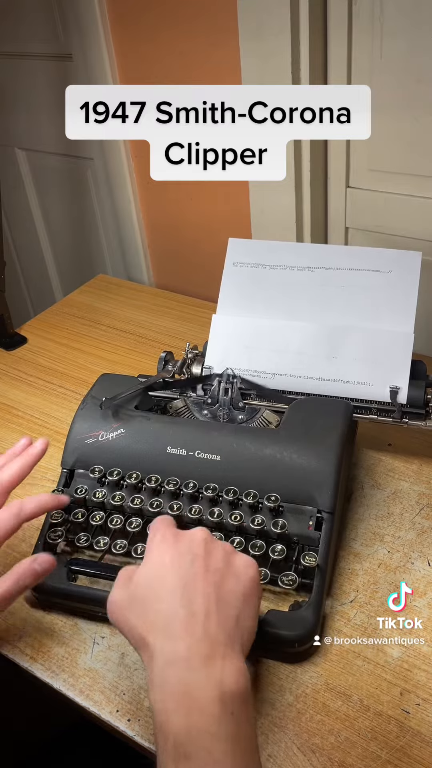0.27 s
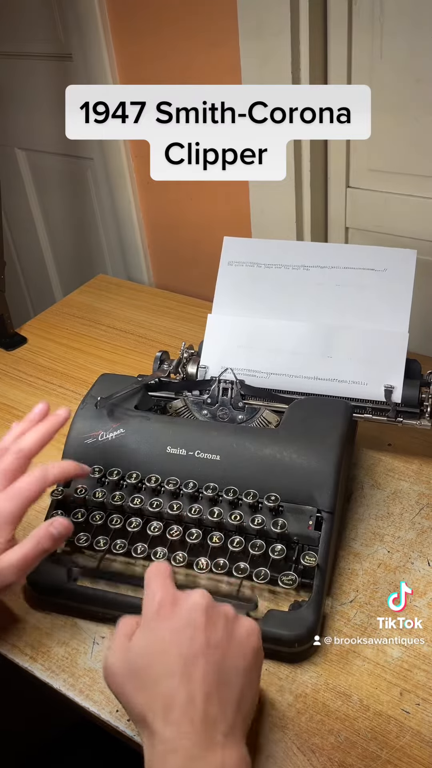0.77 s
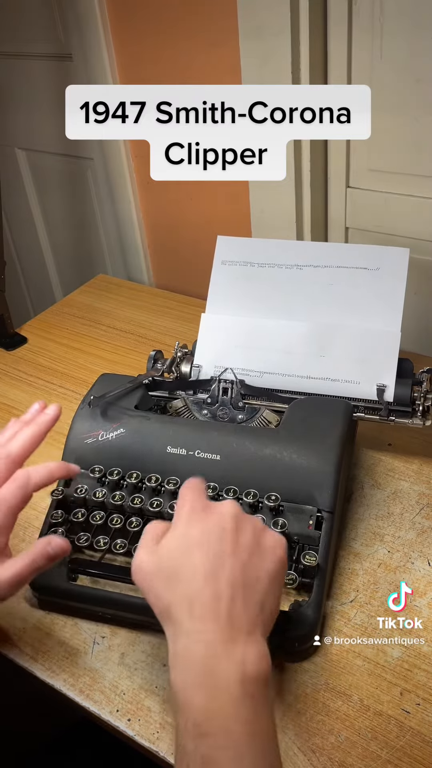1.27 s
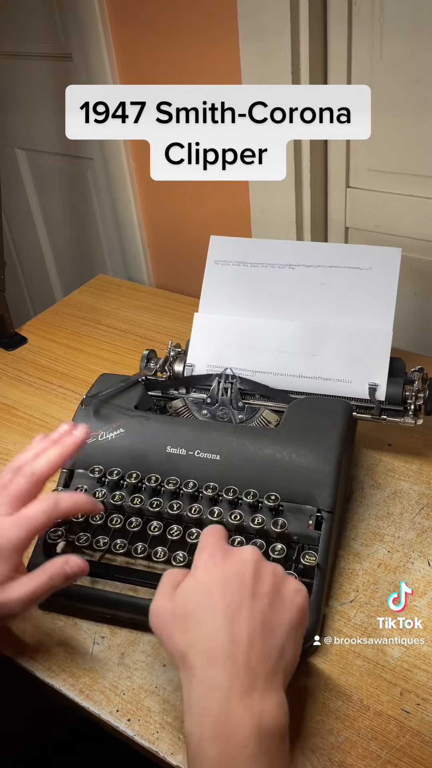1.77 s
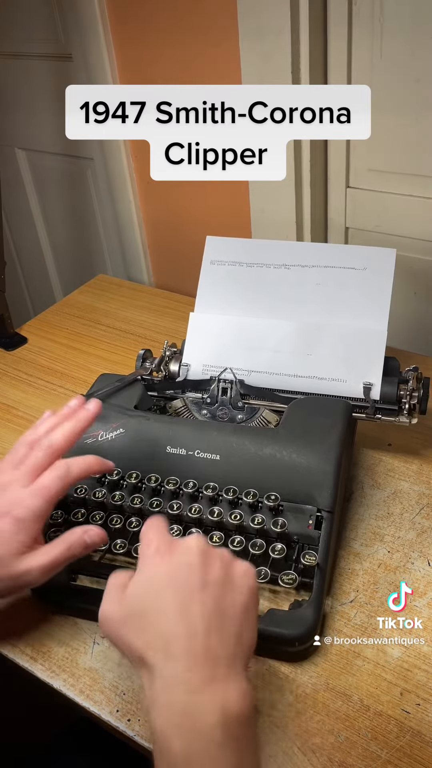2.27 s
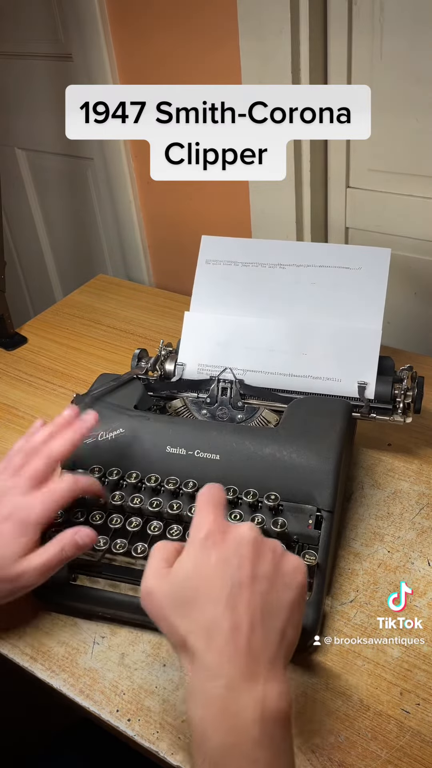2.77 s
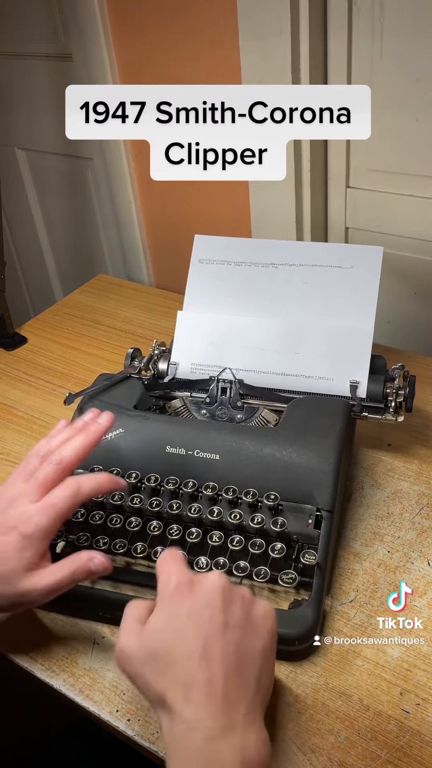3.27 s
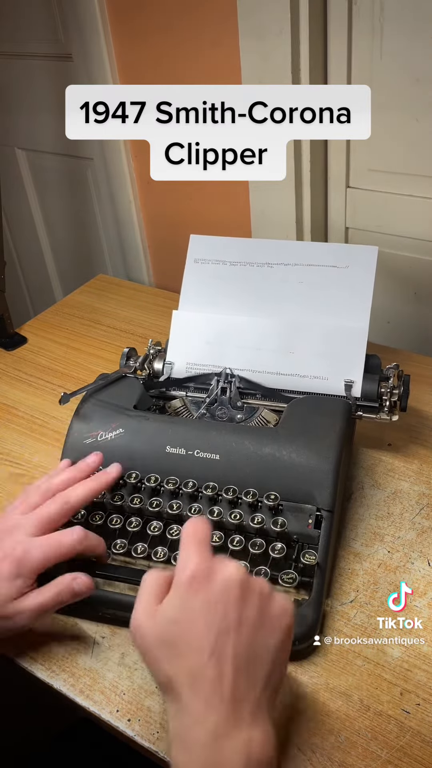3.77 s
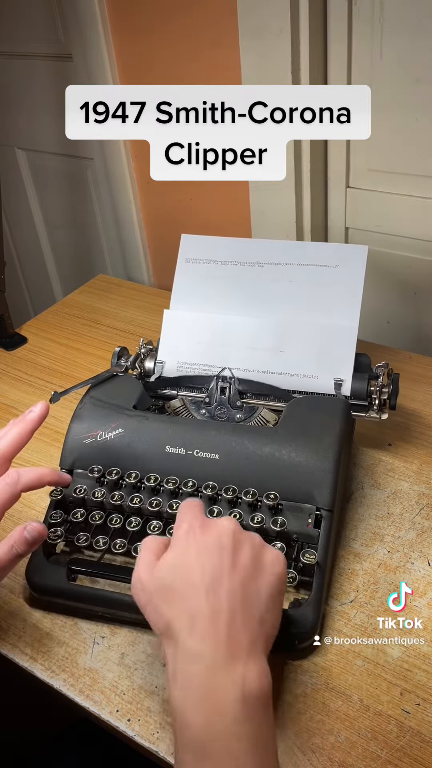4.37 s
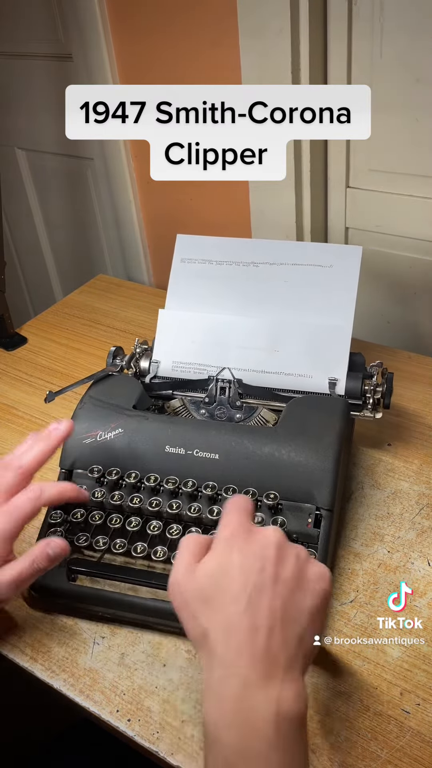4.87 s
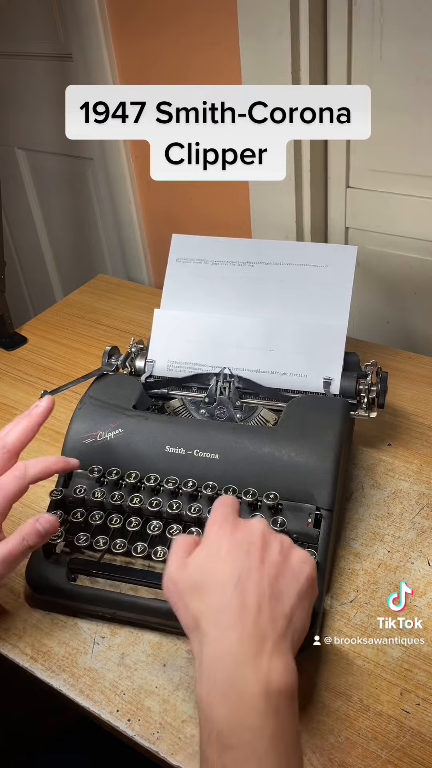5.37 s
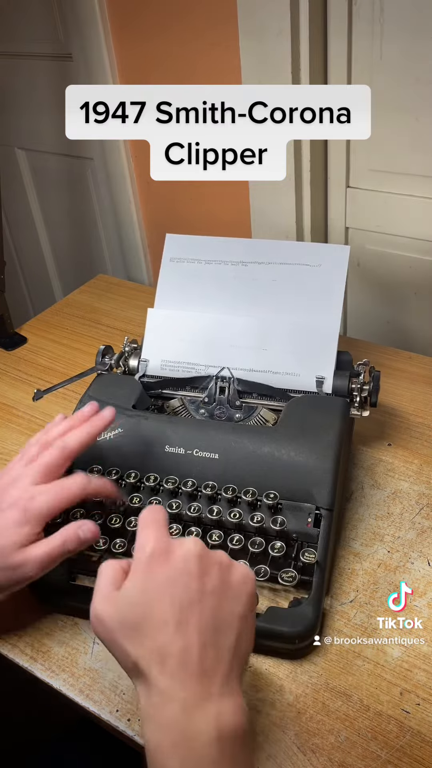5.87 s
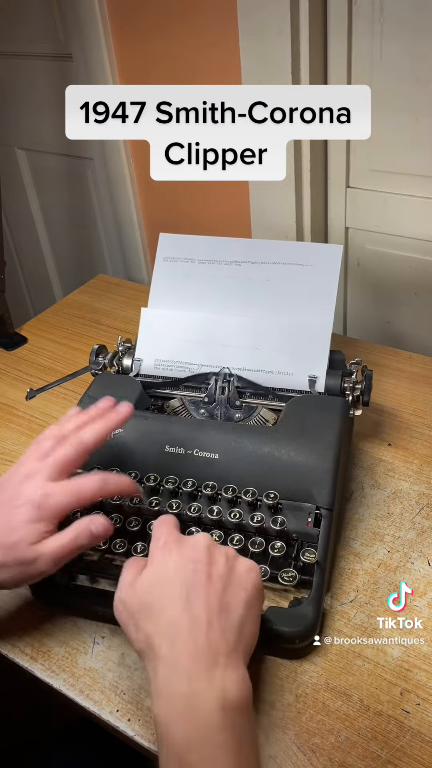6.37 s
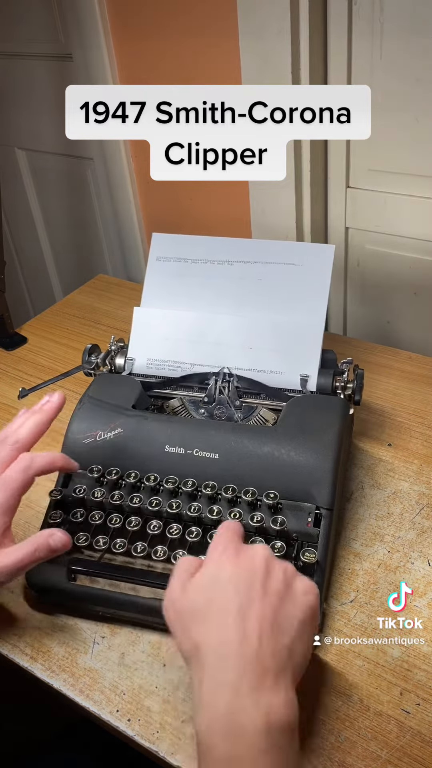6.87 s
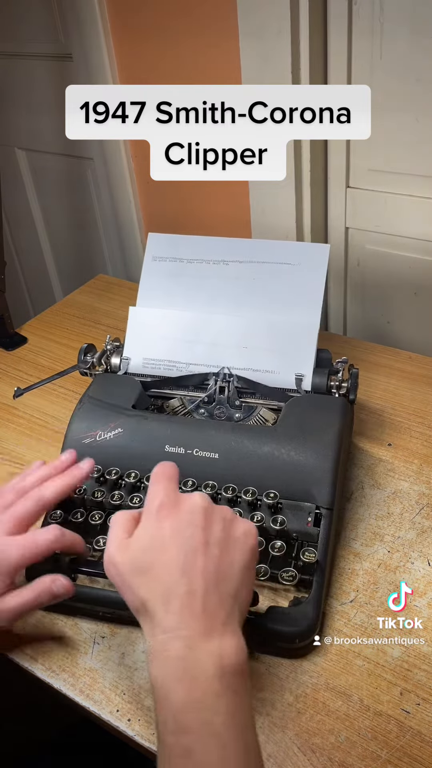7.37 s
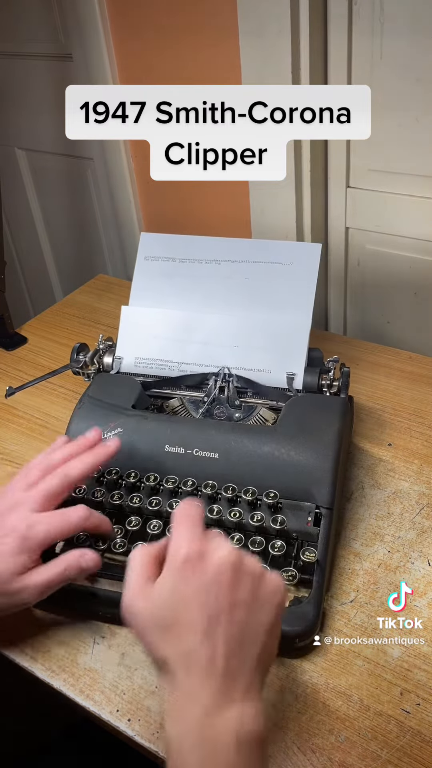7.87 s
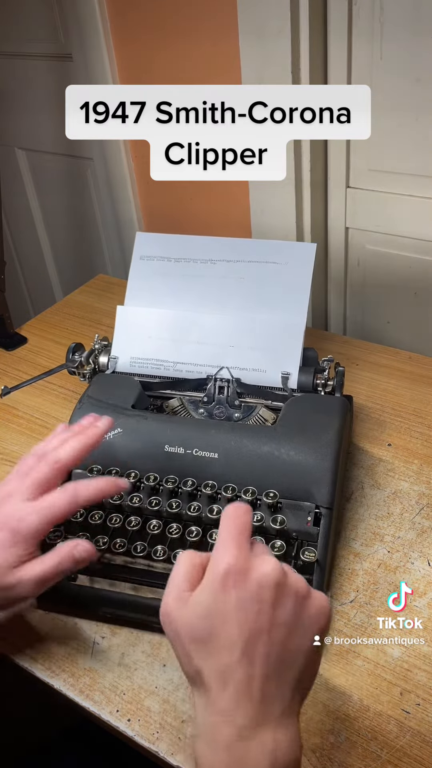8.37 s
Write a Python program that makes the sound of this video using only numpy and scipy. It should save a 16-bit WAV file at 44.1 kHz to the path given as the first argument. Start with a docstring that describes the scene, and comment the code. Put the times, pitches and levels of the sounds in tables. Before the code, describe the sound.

A manual typewriter clacks steadily on a wooden desk, bright metal slaps about five per second, broken by pinging space-bar blows, in a quiet small room.

```python
"""A portable manual typewriter on a wooden desk in a small quiet room, heard by a phone's two close ports.
One dull thump, probably the shift key, comes first; then letters are typed, with space-bar blows between words.
In each letter the levers rattle, the escapement trips, the typebar slaps ringing steel on a rubber platen, the
carriage steps on and the typebar drops back. The space bar pings a steel stop, is held and clacks on its return.
Contacts are shaped noise and ticks, resonances are damped sines; the desk booms below and a hush lies behind."""
import sys
import numpy as np
from scipy import signal
from scipy.fft import rfft, irfft
from scipy.io import wavfile
from scipy.ndimage import uniform_filter1d

SR = 44100
rng = np.random.default_rng(int(sys.argv[2]) if len(sys.argv) > 2 else 0)


def store_pcm(level_fs):
    """Save levels as 16-bit WAV."""
    pcm = np.round(np.clip(level_fs, -1, 1) * 32767).astype(np.int16)
    wavfile.write(sys.argv[1], SR, np.atleast_2d(pcm).T)


N = 379965


def undb(db):
    """Decibels to gain."""
    return 10 ** (np.asarray(db) / 20)


def seconds(length):
    """Time axis of a short sound."""
    return np.arange(int(length * SR)) / SR


def add(track, s, sound):
    """Mix a sound into a track at time s."""
    start = int(np.clip(s * SR, 0, N))
    track[start:start + len(sound)] += sound[:N - start]


def unit(x):
    """Scale to unit energy."""
    return x / np.sqrt(np.sum(x ** 2))


def sized(x, db, length_s):
    """Give a short sound the energy of level db held for length_s."""
    return unit(x) * undb(db) * np.sqrt(length_s * SR)


def through(x, response):
    """Pass a sound through an impulse response."""
    return signal.fftconvolve(x, response)[:len(x)]


def colour(points, size=2048):
    """Minimum-phase, unit-energy response shaped like the given (Hz, dB) spectrum."""
    hz, db = np.transpose(points)
    log_hz = np.log(np.fft.rfftfreq(size, 1 / SR) + 1)
    gain = undb(np.interp(log_hz, np.log(hz), db))
    # folding the cepstrum forward makes the response causal
    cepstrum = irfft(np.log(gain))
    cepstrum[1:size // 2] *= 2
    cepstrum[size // 2 + 1:] = 0
    return unit(irfft(np.exp(rfft(cepstrum))))


def ring(modes, detune=0, scatter_db=0):
    """Unit-energy ring of damped modes; each blow may weight and tune them a little differently."""
    t = seconds(.4)
    out = np.zeros(len(t))
    for k, (hz, db, t60) in enumerate(modes):
        level_chance, pitch_chance = rng.standard_normal(2)
        decay = undb(db + scatter_db * level_chance - 60 * t / t60)
        tone = np.sin(2 * np.pi * hz * (1 + detune * pitch_chance) * t)
        out += decay * tone * (-1) ** k  # neighbours start in opposite directions
    return unit(out)


def chatter(count, grain_db):
    """Tiny contacts of very unequal size, clumping independently in four bands of pitch; rms 1."""
    hz, out = np.fft.rfftfreq(count, 1 / SR), 0
    for lo, hi in [(0, 1300), (1300, 3200), (3200, 7000), (7000, SR)]:
        sizes = np.minimum(rng.exponential(size=count // 24 + 1), 3.5)
        size_db = grain_db * np.repeat(sizes, 24)[:count]
        clumps = rng.standard_normal(count // 150 + 1)
        clump_db = .7 * grain_db * np.repeat(clumps, 150)[:count]
        contacts = rng.standard_normal(count) * undb(size_db + clump_db)
        out = out + rfft(contacts) * (hz >= lo) * (hz < hi)
    return unit(irfft(out, count)) * np.sqrt(count)


def swell(rise, t60, size):
    """Envelope that builds up and dies away, peak 1."""
    t = np.arange(size) / SR
    shape = (1 - np.exp(-t / rise)) * undb(-60 * t / t60)
    return shape / shape.max()


def burst(rise, t60, grain_db, size=6144):
    """Chattering contacts under an envelope that builds up and dies away."""
    return chatter(size, grain_db) * swell(rise, t60, size)


def jingle(count):
    """Separate ticks of small steel parts, each with its own size and pitches, over a fine chatter."""
    ticks_per_s, tick_t60_s, spread_db, tick_share = 330, .018, 4, .62  # share of the energy in the ticks
    t, out = np.arange(512) / SR, np.zeros(count + 512)
    spacing = SR / ticks_per_s  # samples
    for slot in np.arange(0, count - spacing, spacing):
        hz = rng.uniform(700, 9000, (4, 1))
        tick = unit(np.sum(np.sin(2 * np.pi * hz * t), axis=0) * undb(-60 * t / tick_t60_s))
        tick[0] += 1  # the sharp contact itself
        start = int(slot + rng.random() * spacing)
        out[start:start + len(t)] += tick * undb(spread_db * min(rng.exponential(), 2))
    ticks = np.sqrt(tick_share * count) * unit(out[:count])
    return ticks + np.sqrt(1 - tick_share) * chatter(count, grain_db=1.5)


def rattle(rise, t60, size=6144):
    """Loose parts tick under an envelope that builds up and dies away."""
    return jingle(size) * swell(rise, t60, size)


def even(x):
    """Level out the dips and peaks of a contact's spectrum, so that it excites all pitches alike."""
    power = uniform_filter1d(np.abs(rfft(x)) ** 2, size=25)
    hz = np.fft.rfftfreq(len(x), 1 / SR) + 1
    flat = through(x, colour(np.column_stack([hz, -10 * np.log10(power)])))
    return unit(flat) * np.sqrt(np.sum(x ** 2))


def blow(t60, bounce_s, bounce_db, buzz_db, buzz_t60):
    """A hard hit, its rebound and the buzz of loose parts; rms 1 over the first 5 ms."""
    force = burst(0.00017, t60, 0.44) + undb(buzz_db) * burst(0.00078, buzz_t60, 3.2)
    gap = int(bounce_s * rng.uniform(0.87, 1.0) * SR)
    rebound = undb(bounce_db + 2 * rng.standard_normal()) * burst(0.00056, t60, 1)
    force[gap:] += rebound[:len(force) - gap]
    force = even(force)
    return force / np.sqrt(np.mean(force[:SR // 200] ** 2))


def vary(db, stroke_db):
    """A level that follows a share of the stroke's extra strength and differs a little every time."""
    usual_db, effort_share, spread_db = -11.5, 0.56, 2
    return db + effort_share * (stroke_db - usual_db) + spread_db * rng.standard_normal()


# Letters; levels are mix settings that each sound trims further. Each row: slap time in seconds, steel slap
# in dB, platen knock in dB, carriage shudder in dB, finger's push on the machine in dB, time until the typebar
# falls back in seconds, thump and click of its landing in dB, key travel before the slap in seconds,
# lever rattle in dB.
LETTERS = [(0.228, -9, -20, -26.5, -29.5, 0.1, -31, -34, 0.035, -38),
           (0.528, -9.5, -23, -22.5, -33.5, 0.13, -30.5, -33, 0.04, -41.5),
           (0.9713, -10.0, -21, -24, -38, 0.14, -32.5, -36, 0.039, -36.5),
           (1.1749, -9, -19, -23, -35.5, 0.1, -32.5, -34, 0.031, -38.5),
           (1.364, -8.5, -17.5, -24, -31, 0.11, -30.5, -35, 0.03, -40.5),
           (1.563, -10, -20, -23, -39.5, 0.13, -32.5, -36.5, 0.04, -37),
           (1.7299, -9, -19.5, -26.0, -42, 0.1, -30.5, -37, 0.043, -36),
           (2.1431, -9, -17.5, -21, -34.5, 0.096, -27.5, -32, 0.031, -38.5),
           (2.3611, -11, -17, -23.5, -36, 0.12, -29.5, -35, 0.038, -38.5),
           (2.548, -8, -16.5, -24, -34.5, 0.11, -33.0, -36.5, 0.041, -41.5),
           (2.7741, -9.5, -15.5, -26, -44, 0.12, -33, -33, 0.037, -37),
           (2.9964, -10.5, -15.0, -24.5, -33, 0.13, -35, -49, 0.039, -38.0),
           (3.3531, -10.5, -13, -24.0, -32.5, 0.11, -29.5, -34, 0.044, -39),
           (3.5509, -8.5, -12.0, -27, -31, 0.1, -30.5, -36.5, 0.033, -38.5),
           (3.7642, -11, -12, -22, -37, 0.13, -29.5, -33.5, 0.043, -37.0),
           (4.1328, -11.5, -13.0, -25.5, -34, 0.09, -30.5, -35.5, 0.035, -40),
           (4.3074, -10, -12.5, -20, -32, 0.095, -30, -37, 0.03, -42),
           (4.512, -10.5, -13.5, -23.5, -38.5, 0.097, -30, -36, 0.038, -37),
           (4.7482, -10, -14, -20.5, -30.5, 0.093, -31, -35.5, 0.038, -40),
           (4.926, -10.5, -16.5, -23.0, -32, 0.13, -32, -36.5, 0.031, -38.5),
           (5.3262, -8, -13.5, -21.5, -33.5, 0.1, -33, -36, 0.034, -38.0),
           (5.6175, -8.5, -14, -15.5, -33, 0.104, -29.5, -34.0, 0.03, -36),
           (5.7526, -9.5, -17.5, -21.5, -40, 0.12, -30, -34, 0.053, -42.5),
           (5.9486, -9, -17.0, -17.5, -34, 0.111, -27, -29.5, 0.034, -41.5),
           (6.2107, -10, -16.5, -19, -33.5, 0.098, -32, -39, 0.035, -33.5),
           (6.3362, -10.5, -15.5, -17.5, -31.5, 0.098, -28.5, -33.5, 0.022, -30),
           (6.4888, -9.5, -19.5, -18, -48, 0.11, -32, -36.5, 0.026, -36),
           (6.851, -8.5, -16.5, -21.5, -29.5, 0.11, -29.5, -35, 0.032, -34),
           (7.063, -10.5, -20, -19.5, -38, 0.11, -30.5, -33.5, 0.04, -35.5),
           (7.315, -9.5, -19.5, -17, -35, 0.11, -36, -29, 0.038, -36),
           (7.4341, -9.5, -19.5, -20.5, -35.5, 0.092, -28.5, -37, 0.021, -30),
           (7.7984, -11.5, -18.5, -21.5, -35.5, 0.11, -31.0, -34, 0.036, -34.5),
           (7.967, -8.5, -18.5, -20, -32, 0.091, -29, -36, 0.031, -34),
           (8.147, -11.5, -17, -20.5, -34.5, 0.1, -28, -34.5, 0.038, -35),
           (8.4301, -10.0, -15, -18.5, -24.5, 0.1, -32, -38.5, 0.03, -32.0)]
# Where the struck steel's ring is known along the carriage's travel: the time of each place in seconds.
CARRIAGE_PLACES_S = [1.6, 3.9, 6.2, 8.2]
# Modes of the struck steel. Each row: pitch in Hz, t60 in seconds, relative level in dB at each of the places.
STRUCK_STEEL = [(4534, 0.023, 2.5, -10, -6, -1), (4860, 0.015, -20.5, -23, -3.5, -8),
                (5400, 0.033, -11, -5.5, -6, -1.5), (5700, 0.017, -17, -3.5, -6, -24),
                (6060, 0.026, -9, 0, -5.5, 7), (6330, 0.014, 3, -0.5, -2.5, 8.5),
                (6760, 0.013, -3.5, -2, -6.5, 5), (6870, 0.018, -5, -8, -3, -7.5),
                (7260, 0.025, 6, -5, -8, -5), (7410, .016, -1, 3, 0.5, -8), (7600, .017, -5, -1.5, 0, 5),
                (8640, 0.021, -2, -9, -5, -10)]
# Modes of the platen. Each row: pitch in Hz, relative level in dB, t60 in seconds.
PLATEN_MODES = [(1785, -3, 0.027), (2220, -15, 0.0063), (2340, -5.5, 0.006), (2890, 11.5, 0.033),
                (3010, 7, 0.0045)]
# Spectra of the dry slap, the dry knock and the first crack. Each row: frequency in Hz, relative level in dB.
SLAP_SPECTRUM = [(1000, -24), (3600, -18), (5000, -9), (6400, -0.5), (7400, -2), (8200, 1.5), (10000, 1),
                 (13000, -27), (15400, -10.5), (17000, -32.5)]
KNOCK_SPECTRUM = [(200, -1), (700, -21.5), (1100, -3.5), (1700, 2.5), (2800, 7.5), (3500, -2.5),
                  (5000, -19), (12000, -31.5)]
CRACK_SPECTRUM = [(3000, -35), (8000, -1), (10500, -7), (13000, -9), (15500, -8), (17000, -23)]


def typebars():
    """The slug slaps the paper: steel rings bright, rubber knocks; the ring shifts as the carriage travels."""
    steel_ring_db, platen_ring_db = -3.5, -5.5  # relative to the dry blow
    crack_db = -6.5  # the slug's first contact, relative to the slap
    out, contact = np.zeros((2, N))
    steel_colour, rubber_colour = colour(SLAP_SPECTRUM), colour(KNOCK_SPECTRUM)
    for s, slap_db, knock_db, *_ in LETTERS:
        modes = [(hz, np.interp(s, CARRIAGE_PLACES_S, dbs), t60) for hz, t60, *dbs in STRUCK_STEEL]
        steel = blow(t60=0.006, bounce_s=0.0014, bounce_db=-7, buzz_db=-24.5, buzz_t60=0.089)
        rubber = blow(t60=0.0041, bounce_s=0.0028, bounce_db=-11.5, buzz_db=-16.0, buzz_t60=0.017)
        steel_ring = unit(through(steel, ring(modes, detune=0.004, scatter_db=2.5)))
        slap = unit(through(steel, steel_colour)) + undb(steel_ring_db) * steel_ring
        platen_ring = unit(through(rubber, ring(PLATEN_MODES, detune=0.014, scatter_db=3.5)))
        knock = unit(through(rubber, rubber_colour)) + undb(platen_ring_db) * platen_ring
        add(out, s, sized(slap, slap_db, length_s=0.002))
        add(out, s, sized(knock, knock_db, length_s=0.0014))
        crack = burst(rise=0.00033, t60=0.015, grain_db=13.0, size=1024)
        add(contact, s, undb(slap_db + crack_db) * crack)
    return out + through(contact, colour(CRACK_SPECTRUM))


# Space-bar strokes; levels are mix settings that each sound trims further. Each row: start in seconds, blow in
# dB, ping relative to the blow in dB, thump in dB, time held down in seconds, release click in dB, time to
# rise in seconds, clack at the top in dB.
SPACES = [(0.7477, -16, 0, -31, .1025, -28.5, .03, -39), (1.9034, -16, 0, -22.5, .099, -26, .031, -29),
          (3.1256, -18, -1, -31, .102, -29.5, .025, -36), (3.9003, -16.5, -1, -29, .092, -27, .031, -32),
          (5.0769, -18.5, -9, -29, .082, -28, .029, -31), (6.6, -16.5, -1, -23.5, .088, -28, .049, -33),
          (7.633, -16, 0, -26, .1015, -27, .035, -35)]
# Modes of the steel stop. Each row: pitch in Hz, relative level in dB, t60 in seconds.
SPACE_STOP_MODES = [(1780, -15, 0.042), (4010, -11.5, 0.029), (5568, -2.5, 0.032), (5640, -7, 0.019),
                    (6300, -9, 0.013), (7440, -8, 0.0097), (9010, -11, 0.019), (10140, -15, 0.024)]
# Spectrum of the escapement pawl and the space bar's rod. Each row: frequency in Hz, relative level in dB.
PAWL_SPECTRUM = [(200, 2.5), (700, 2.5), (1500, 6.5), (3500, 3), (6300, 2), (8500, -31), (11000, -16),
                 (13000, -23), (15500, -15)]


def space_bar():
    """The bar bottoms on a steel stop that pings while the rod behind it buzzes."""
    force, ping = np.zeros((2, N))
    for s, db, ping_db, *_ in SPACES:
        hit = blow(t60=0.026, bounce_s=0.0044, bounce_db=-11, buzz_db=-7.0, buzz_t60=0.055)
        add(force, s, undb(db) * hit)
        stop = ring(SPACE_STOP_MODES, detune=0.0034, scatter_db=-0.5)
        add(ping, s + .0005, undb(db + ping_db + 22.0) * stop)  # lifts the unit-energy ring
    return ping + undb(-11.0) * through(force, colour(PAWL_SPECTRUM))


# Modes of the carriage. Each row: pitch in Hz, relative level in dB, t60 in seconds.
CARRIAGE_MODES = [(450, -3, .1), (542, 0, .11), (603, 0, .045), (668, 6, .06), (740, -2, .035),
                  (870, -4, .045), (945, 1, .05)]
# Spectrum of the carriage's dry thud. Each row: frequency in Hz, relative level in dB.
BODY_SPECTRUM = [(200, -6), (400, -5.5), (540, -3), (680, 14.5), (800, -16.5), (950, 1.5), (1200, -2),
                 (2500, -11.5), (6500, -20.5), (11000, -41), (15500, -34)]


def carriage():
    """The carriage shudders under the slap, slides one step and bumps its stop with a dry thud."""
    step_s, step_db = 0.034, -33.5  # the next stop is reached about this long after the blow
    force = np.zeros(N)
    shudders = [(s, db) for s, _, _, db, *_ in LETTERS] + [(s, db - 7.0) for s, db, *_ in SPACES]
    for s, shudder_db in shudders:
        shudder = even(burst(rise=0.00018, t60=0.012, grain_db=-2.0))
        add(force, s + 0.00179, undb(shudder_db + 0.24) * shudder)
        step_time = s + step_s + .002 * rng.standard_normal()
        step = even(burst(rise=0.0065, t60=0.071, grain_db=2.5))
        add(force, step_time, undb(step_db + rng.standard_normal()) * step)
    return through(force, colour(BODY_SPECTRUM)) + undb(-5.5) * through(force, ring(CARRIAGE_MODES))


# Spectrum of the rattling levers. Each row: frequency in Hz, relative level in dB.
LINKAGE_SPECTRUM = [(100, -21.5), (350, 9.5), (1000, -1), (1900, -5.5), (2700, -4), (4000, -7.5),
                    (6500, -5), (8500, -6.5), (10500, -8), (13000, -13.5), (15500, -4)]


def linkage():
    """Levers rattle while the key goes down, and trip the escapement just before the slap."""
    pawl_lead_s, pawl_db = 0.0125, -34
    levers, pawl = np.zeros((2, N))
    for s, slap_db, *_, travel_s, levers_db in LETTERS:
        add(levers, s - travel_s, undb(levers_db) * jingle(count=4096)[:int(travel_s * SR)])
        trip_time = s - pawl_lead_s * rng.uniform(.85, 1.15)
        add(pawl, trip_time, undb(vary(pawl_db, slap_db)) * rattle(rise=0.0079, t60=0.052))
    for s, *_ in SPACES:
        add(levers, s - .011, undb(-36.0) * rattle(rise=0.0042, t60=0.057))
    return through(levers, colour(LINKAGE_SPECTRUM)) + through(pawl, colour(PAWL_SPECTRUM))


# Spectrum of the typebars on their rest. Each row: frequency in Hz, relative level in dB.
BASKET_SPECTRUM = [(150, -2.5), (400, 4.5), (1200, 0.5), (2000, -3), (3400, -6), (5600, -8), (6500, -9),
                   (9000, -8.5), (13000, -14.5), (15500, -7)]


def basket():
    """Typebars drop back on their rest and jostle their neighbours."""
    force = np.zeros(N)
    for s, *_, fall_s, _, click_db, _, _ in LETTERS:
        db = click_db - 0.8
        add(force, s + fall_s - .022, undb(db - 4.0) * rattle(rise=0.0088, t60=0.12))  # jostling
        add(force, s + fall_s - .001, undb(db) * rattle(rise=0.0004, t60=0.057))  # landing
    return through(force, colour(BASKET_SPECTRUM))


# Spectrum of springs, links and key rings. Each row: frequency in Hz, relative level in dB.
SPRINGS_SPECTRUM = [(200, -8), (600, -1), (1500, 0), (2000, -2), (2700, 1), (3800, -2), (5200, -1),
                    (7000, 1), (9000, -1), (11000, -6), (13000, -18), (15500, -19)]


def rebounds():
    """The typebar chatters on the ribbon guide after the slap; after every stroke loose links tick one by one."""
    force, ticks = np.zeros((2, N))
    for s, db, *_ in LETTERS:
        guide = burst(rise=0.00028, t60=0.0075, grain_db=-2, size=1024)
        add(force, s + 0.012 + 0.00053 * rng.standard_normal(), undb(db - 15.0) * guide)
    for s, *_ in LETTERS + SPACES:
        for when, softness in rng.random((6, 2)):
            tick = burst(rise=0.00016, t60=0.013, grain_db=6.5, size=1024)
            add(ticks, s + .13 * when + .012, undb(-34.0 - 8.9 * softness - 8.3 * when) * tick)
    return through(force, colour(SLAP_SPECTRUM)) + through(ticks, colour(SPRINGS_SPECTRUM))


def aftershake():
    """Every blow leaves springs, links and key rings rattling, half as many dB stronger as the blow."""
    force = np.zeros(N)
    for s, db, *_ in LETTERS + SPACES:
        add(force, s + .004, undb(-36.5 + .5 * (db + 5.5)) * rattle(rise=0.0014, t60=0.27))
    return through(force, colour(SPRINGS_SPECTRUM))


# Spectrum of the returning bar and nudged keys. Each row: frequency in Hz, relative level in dB.
RELEASE_SPECTRUM = [(150, 8.5), (330, 9.5), (550, -4), (1100, 2), (2000, -6), (2900, 2), (3600, 0),
                    (5600, -1.5), (7000, -8), (9000, -4), (13000, -20), (15500, -20)]


def space_return():
    """The rising bar unlatches with a tick, clicks the carriage on, rattles and clacks on its upper stop."""
    unlatch_lead_s, unlatch_db, rattle_db = .015, -41, -33.5
    force = np.zeros(N)
    for s, *_, held_s, click_db, rise_s, clack_db in SPACES:
        release = s + held_s
        add(force, release - unlatch_lead_s, undb(unlatch_db) * rattle(rise=.0006, t60=0.012))
        add(force, release, undb(click_db + 1.5) * burst(rise=0.0008, t60=0.05, grain_db=1))
        add(force, release + 0.014, undb(rattle_db) * rattle(rise=0.0077, t60=0.14))
        add(force, release + rise_s, undb(clack_db) * burst(rise=0.0015, t60=0.05, grain_db=1))
    return through(force, colour(RELEASE_SPECTRUM))


# Faint lone clicks between strokes. Each row: start in seconds, click in dB.
TAPS = [(3.081, -36), (5.02, -38), (6.084, -35), (6.181, -35)]


def taps():
    """A faint lone click, with a faint ping."""
    force, ping = np.zeros((2, N))
    for s, db in TAPS:
        add(force, s, undb(db) * rattle(rise=0.0013, t60=0.12))
        add(ping, s, undb(db + 8) * ring(SPACE_STOP_MODES, detune=0.0034))  # lifts the unit-energy ring
    return ping + through(force, colour(RELEASE_SPECTRUM))


# Modes of the frame. Each row: pitch in Hz, relative level in dB, t60 in seconds.
FRAME_MODES = [(1070, -24, 0.052), (1730, -10.5, 0.067), (2370, 10, 0.085), (2500, 1, 0.064),
               (2930, 0, 0.12), (3313, 4, 0.061), (3750, -12.5, 0.065), (4260, -9, 0.069),
               (5560, -13, 0.04), (5900, 3.5, 0.028), (6400, -6, 0.079), (6680, 12, 0.076),
               (7430, 7.5, 0.12)]


def ringing_clatter():
    """All the small parts' clatter, with the metal frame ringing along."""
    clatter = rebounds() + linkage() + aftershake() + basket() + space_return() + taps()
    return clatter + undb(-16) * through(clatter, ring(FRAME_MODES))


SHIFT_S = 0.067  # start of the dull thump before the first letter, probably the shift key
# Spectrum of its knock. Each row: frequency in Hz, relative level in dB.
SHIFT_KNOCK_SPECTRUM = [(100, -7), (200, -3), (310, 5), (480, -5), (700, -16), (1500, -31), (6000, -50),
                        (15000, -62)]


def shift_key():
    """A soft, wide knock of the frame."""
    force = np.zeros(N)
    add(force, SHIFT_S, undb(-22.5) * even(burst(rise=0.0017, t60=0.057, grain_db=3.0)))
    return through(force, colour(SHIFT_KNOCK_SPECTRUM))


# Jolts of the machine: delay in seconds, desk in dB, casing in dB, tilt of the desk in dB per octave.
SHIFT_JOLT = (-0.004, -25.5, -31, -0.5)
PUSH_JOLT, STEP_JOLT = (-0.005, -1.5, -3, 0), (0.038, -34.5, -45, -2)
LANDING_JOLT = (0.002, 0.3, -9, 1.5)
SPACE_JOLT, SPACE_STEP_JOLT = (0.002, -3, -2, 1.5), (0.038, -32, -39, -1)
RELEASE_JOLT = (0.004, -41, -34, 0)


def jolts():
    """Rows of time, desk dB, casing dB and tilt: jolts as keys bottom, the carriage stops and keys return."""
    causes = [(SHIFT_S, 0, SHIFT_JOLT)]
    for s, slap_db, _, _, push_db, fall_s, landing_db, *_ in LETTERS:
        causes.append((s, push_db, PUSH_JOLT))
        causes.append((s, vary(0, slap_db), STEP_JOLT))
        causes.append((s + fall_s, landing_db, LANDING_JOLT))
    for s, blow_db, _, thump_db, held_s, *_ in SPACES:
        causes.append((s, thump_db, SPACE_JOLT))
        causes.append((s, vary(0, blow_db), SPACE_STEP_JOLT))
        causes.append((s + held_s, 0, RELEASE_JOLT))
    return [(s + delay, db + desk_db, db + casing_db, tilt)
            for s, db, (delay, desk_db, casing_db, tilt) in causes]


def bend(x, lag_s):
    """Bending waves in a board: low notes travel slower, so a thump droops in pitch; lag_s holds at 150 Hz."""
    hz = np.fft.rfftfreq(N, 1 / SR)
    lag = lag_s * np.sqrt(150 / (hz + 1))
    phase = 2 * np.pi * np.cumsum(lag) * SR / N
    return irfft(rfft(x) * np.exp(-1j * phase), N)


# Modes of the desk top and the casing. Each row: pitch in Hz, relative level in dB, t60 in seconds.
DESK_MODES = [(46.7, -25, 0.38), (64.5, -11.5, 0.33), (93.6, -8, 0.24), (121, -8, 0.19), (145, 2, 0.22),
              (170.5, -2, 0.097), (204.7, 0, 0.15)]
CASING_MODES = [(276.6, 0, 0.23), (312.3, 0.5, 0.23), (345.3, -2, 0.35), (447, -9.5, 0.27),
                (548, -11, 0.033)]
# Spectrum of the contact thud. Each row: frequency in Hz, relative level in dB.
THUD_SPECTRUM = [(100, -3), (280, -3.5), (500, -2.5), (800, -9), (1500, -11.5), (4000, -24.5), (8000, -24),
                 (13000, -38.5)]


def desk():
    """Each jolt is a dull contact thud, a clunk of the casing and then a soft boom of the desk top."""
    wood, thuds = np.zeros((2, N))
    for s, desk_db, casing_db, tilt in jolts():
        modes = [(hz, db + tilt * np.log2(hz), t60) for hz, db, t60 in DESK_MODES]
        boom = ring(modes, detune=0.039, scatter_db=4.0)
        clunk = ring(CASING_MODES, detune=0.017, scatter_db=5.5)
        t = np.arange(len(boom)) / SR
        # both start early because the board delays them
        add(wood, s - .03, sized(boom * (1 - np.exp(-t / 0.017)), desk_db, length_s=0.032))
        add(wood, s - .02, sized(clunk * (1 - np.exp(-t / 0.001)), casing_db, length_s=0.012))
        add(thuds, s + 0.001703, undb(casing_db - 5.0) * burst(rise=0.0012, t60=0.094, grain_db=1.0))
    return bend(wood, lag_s=.03) + through(thuds, colour(THUD_SPECTRUM))


def sway():
    """The heavy carriage stops and the desk gives a slow, deep shake in its three lowest modes."""
    out = np.zeros(N)
    for strokes, delay_s, db in [(LETTERS, .038, -43.5), (SPACES, .014, -34)]:
        for s, stroke_db, *_ in strokes:
            shake = ring(DESK_MODES[:3], detune=0.04, scatter_db=3)
            t = np.arange(len(shake)) / SR
            slow_shake = shake * (1 - np.exp(-t / 0.082))
            add(out, s + delay_s, sized(slow_shake, vary(db, stroke_db), length_s=0.021))
    return out


# Decay of the room. Each row: frequency in Hz, t60 in seconds.
ROOM_T60 = [(100, 0.022), (400, 0.42), (1500, 0.27), (4000, 0.26), (8000, 0.011), (15000, 0.037)]


def room_response():
    """Diffuse reflections of a small room, as noise bands that each die at their own rate."""
    t = seconds(.5)
    hz, t60 = np.transpose(ROOM_T60)
    edges = np.geomspace(60, 18000, 11)
    tail = 0
    for lo, hi in zip(edges, edges[1:]):
        band_filter = signal.butter(2, [lo, hi], "band", fs=SR, output="sos")
        band = signal.sosfilt(band_filter, rng.standard_normal(len(t)))
        band_t60 = np.interp(np.log(lo * hi) / 2, np.log(hz), t60)
        tail = tail + band * undb(-60 * t / band_t60)
    return unit(tail * np.clip(t / 0.00049 - .5, 0, 1))  # silent until the first reflection


# Spectrum of the hush. Each row: frequency in Hz, relative level in dB.
QUIET_SPECTRUM = [(20, -9), (32, -24.5), (45, -5.5), (100, -1), (210, -1.5), (280, -4), (500, -27),
                  (1200, -29.5), (2500, -34), (6000, -45), (15000, -52.5)]


def house_hush():
    """The low hush of the house: steady coloured noise."""
    return undb(-48) * through(rng.standard_normal(N), colour(QUIET_SPECTRUM, size=8192))


# Steady tones of the room. Each row: pitch in Hz, rms level in dB.
HUM_TONES = [(349, -57.5), (1228, -70)]


def hum():
    """Faint steady tones in the room, sharing a slight unsteadiness of pitch."""
    drift = uniform_filter1d(rng.standard_normal(N), size=4096)
    warped_time = np.cumsum(1 + .004 * drift / drift.std()) / SR  # 0.4 % rms drift
    return sum(undb(db) * np.sqrt(2) * np.sin(2 * np.pi * hz * warped_time) for hz, db in HUM_TONES)


def scene():
    """The machine, its room and the low hush of the house, on two channels."""
    room_db, side_db = -16, -17.5
    machine = typebars() + ringing_clatter() + carriage() + space_bar() + shift_key() + desk() + sway()
    room = undb(room_db) * through(machine, room_response())
    mid = machine + room + house_hush() + hum()
    # close ports hear the same bass; only shorter waves differ between them
    high_pass = signal.butter(2, 400, "high", fs=SR, output="sos")
    side = signal.sosfilt(high_pass, through(machine, room_response()))
    return mid + undb(side_db) * side * np.array([[1], [-1]])


# The two microphone ports. Each row: frequency in Hz, left's phase lead in radians, left minus right in dB.
PORTS = [(0, 0, 0), (400, 0, 0), (800, -.3, 0), (1200, -.1, -1.5), (2100, 0, 0), (2760, .9, -2),
         (3300, .5, -4), (3900, .35, 0), (4800, .45, 0), (6000, 1.35, 0), (8000, 2.25, 0), (9700, 3.05, 0),
         (13500, 3.2, 0), (15500, 3.7, 0)]


def record(dry):
    """The two ports differ in phase and shading; the phone cuts the deep bass and the top."""
    hz, lead, balance = np.transpose(PORTS)
    bins = np.fft.rfftfreq(N, 1 / SR)
    phase, balance_db = np.interp(bins, hz, lead), np.interp(bins, hz, balance)
    half = np.array([[.5], [-.5]])  # each port takes half of the difference
    ports = irfft(rfft(dry) * undb(half * balance_db) * np.exp(1j * half * phase), N)
    bass_cut = signal.butter(4, 38, "high", fs=SR, output="sos")
    top_cut = signal.ellip(10, .2, 80, 15900, fs=SR, output="sos")
    ports = signal.sosfilt(bass_cut, ports)
    return signal.sosfilt(top_cut, np.clip(ports, -1, 1))


dry = scene()
out = record(dry)
store_pcm(out)
```